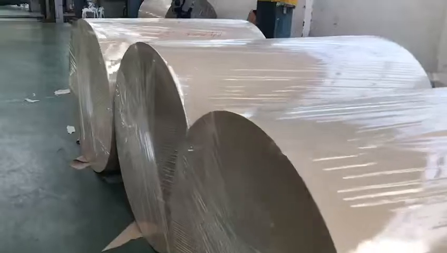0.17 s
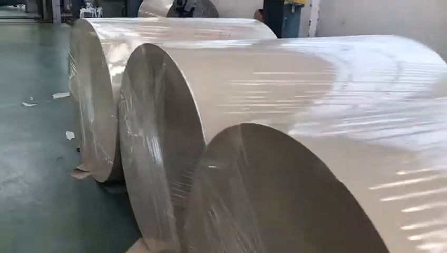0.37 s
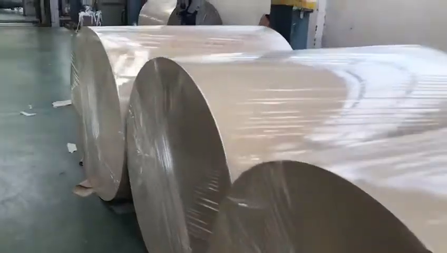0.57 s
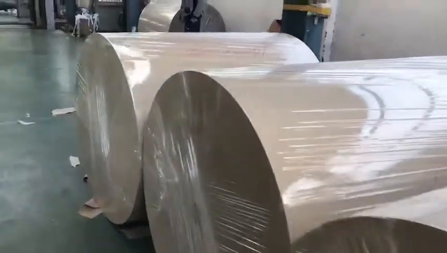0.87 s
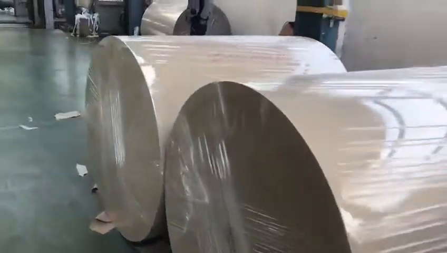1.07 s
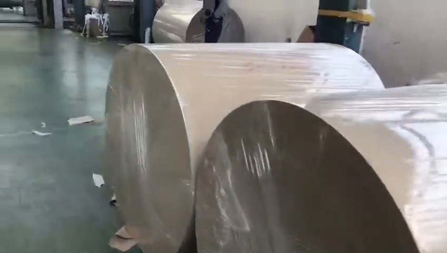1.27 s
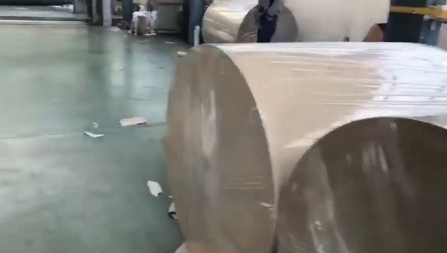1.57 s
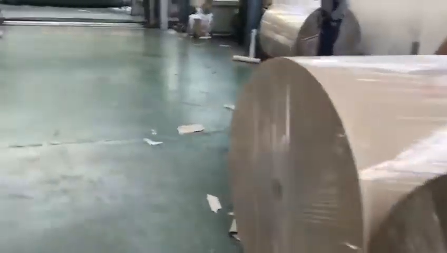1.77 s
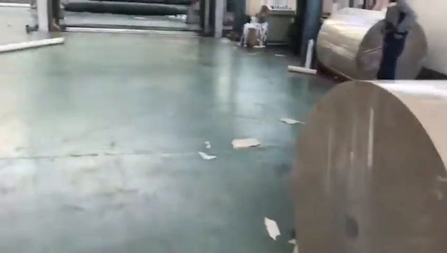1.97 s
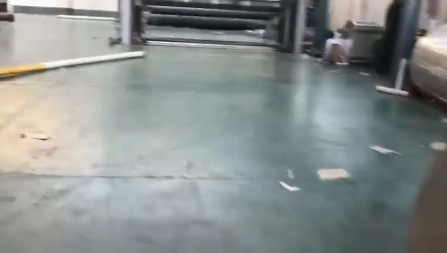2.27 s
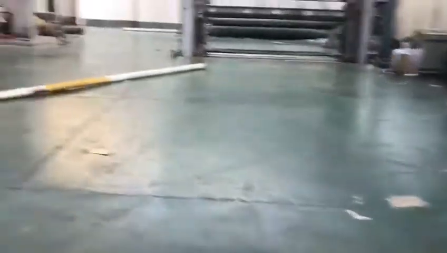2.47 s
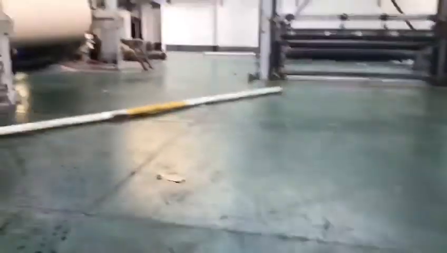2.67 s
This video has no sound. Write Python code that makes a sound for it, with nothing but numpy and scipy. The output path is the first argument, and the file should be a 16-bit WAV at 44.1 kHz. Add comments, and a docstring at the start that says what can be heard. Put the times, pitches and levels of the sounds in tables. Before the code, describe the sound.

Steady low machinery rumble and hum, with rushing air, fills a big factory hall.

```python
"""A large factory hall with paper-making machines running steadily. A roll drive, a pump, a motor
and the mains hum, a gear whines roughly near 1 kHz, and rumble, rushing air and hiss fill the hall.
The microphone is carried slowly through the hall's standing waves, so each low tone swells and
fades on its own."""
import sys
import numpy as np
from scipy import signal
from scipy.fft import rfft, irfft, next_fast_len
from scipy.io import wavfile
from scipy.ndimage import uniform_filter1d, map_coordinates

SR = 44100
rng = np.random.default_rng(int(sys.argv[2]) if len(sys.argv) > 2 else 0)


def put_to_file(sound):
    """Save the sound as 16-bit audio at rate SR, in the file named by the first command-line argument."""
    columns = np.atleast_2d(sound).T  # one column per channel
    safe = np.clip(columns, -1, 1)
    whole_steps = np.round(safe * 32767)
    wavfile.write(sys.argv[1], SR, whole_steps.astype(np.int16))


N = 124803

DRIVE_HZ, PUMP_HZ, MOTOR_HZ, MAINS_HZ = 24.78, 36.72, 334.35, 50


def roll_drive():
    """Low hum: overtones of the drive's rotation."""
    # Each row: time in seconds, level in dB.
    order_4 = [(0.13, -47), (0.22, -43), (0.57, -22), (0.6, -26), (0.87, -22), (1.44, -35), (1.52, -52),
               (1.66, -28), (1.83, -23), (2.35, -18.5), (2.8, -17.5)]
    order_6 = [(0.13, -35), (0.45, -25), (1.21, -31.5), (1.33, -27.5), (2.37, -30.5), (2.43, -42),
               (2.51, -27), (2.8, -34)]
    order_8 = [(.13, -30), (.5, -49), (.8, -27.5), (1.3, -31.5), (1.8, -28.5), (2.2, -27), (2.8, -30.5)]
    # Each row: order, level in dB.
    weak = [(2, -40.5), (7, -34.5), (10, -34.5)]
    return machine(DRIVE_HZ, {4: order_4, 6: order_6, 8: order_8}, weak)


def pump():
    """Deep hum: the pump's fundamental and overtones."""
    # Each row: time in seconds, level in dB.
    order_1 = [(.13, -35.5), (1.2, -30), (2.1, -27), (2.8, -23.5)]
    order_7 = [(.13, -25.5), (.6, -29.5), (1, -27.5), (1.3, -22.5), (1.7, -31), (2.15, -23.5), (2.5, -31),
               (2.8, -24)]
    # Each row: order, level in dB.
    weak = [(2, -36), (6, -33.5)]
    return machine(PUMP_HZ, {1: order_1, 7: order_7}, weak)


def motor():
    """Higher hum: the motor's fundamental and faint overtones."""
    # Each row: time in seconds, level in dB.
    order_1 = [(.13, -46), (.4, -31.5), (.75, -33.5), (1, -35.5), (1.25, -29), (1.6, -25), (2, -37.5),
               (2.35, -37), (2.8, -44)]
    # Each row: order, level in dB.
    weak = [(2, -46), (5, -52.5), (20, -70)]
    return machine(MOTOR_HZ, {1: order_1}, weak)


def mains():
    """Electrical hum: two mains overtones."""
    # Each row: time in seconds, level in dB.
    order_12 = [(.13, -54), (.4, -35.5), (.75, -36.5), (1.1, -47.5), (1.4, -34), (1.8, -42), (2.1, -54),
                (2.35, -35), (2.8, -45.5)]
    # Each row: order, level in dB.
    weak = [(6, -39)]
    return machine(MAINS_HZ, {12: order_12}, weak)


def gear_whine():
    """Close lines beating in a fluttering band."""
    # Each row: time in seconds, level in dB.
    level = [(.13, -31), (.3, -35), (.4, -27.5), (.5, -35.5), (.8, -34.5), (1, -31), (1.17, -37.5),
             (1.42, -32.5), (1.65, -35), (1.85, -33.5), (2.03, -34), (2.3, -32), (2.8, -31.5)]
    # Each row: frequency in Hz, dB relative to that level.
    lines = [(1006.6, -6.5), (1018.6, -9), (1040, -9)]
    beating = sum(machine(hz, {}, [(1, db)]) for hz, db in lines)
    flutter = amp(-4) * band(1009.4, width_hz=51)
    return amp(curve(level)) * (beating + flutter)


def motor_whistle(order=10, line_db=1.5):
    """A high motor overtone: a thin line in a rough band."""
    # Each row: time in seconds, level in dB.
    level = [(.13, -57.5), (.9, -57.5), (1.25, -56), (1.48, -64), (1.8, -55), (2.5, -63), (2.76, -53.5)]
    line = machine(MOTOR_HZ, {}, [(order, line_db)])
    return amp(curve(level)) * (line + band(order * MOTOR_HZ, width_hz=40))


def bearings():
    """Weak, rough bands from bearings and gears."""
    # Each row: centre in Hz, width in Hz, level in dB.
    bands = [(653, 77, -42), (1370, 190, -51.5), (2917, 150, -54), (5400, 630, -59)]
    return sum(amp(db) * band(hz, width_hz) for hz, width_hz, db in bands)


def far_machines():
    """Single tones from machines farther away."""
    # Each row: frequency in Hz, level in dB.
    lines = [(238.4, -32), (444, -51), (454, -48.5), (580, -48.5), (5865, -77), (5928, -62)]
    return sum(machine(hz, {}, [(1, db)]) for hz, db in lines)


def hall(air_db_per_s=0.34, hiss_db_per_s=2.4):
    """Reverberant rumble, rushing air, and hiss that grows as the microphone turns to the machine."""
    # Each row: frequency in Hz, relative spectral density in dB.
    rumble_spectrum = [(20, -34), (35, -14), (60, -5), (90, -6.5), (135, -2), (200, -2.5), (255, 0),
                       (320, -8.5), (400, -19), (700, -20), (2000, -86)]
    air_spectrum = [(100, -1), (400, 1), (700, 0), (950, 2), (1350, -1), (1900, -7.5), (2700, -10),
                    (3500, -13.5), (4800, -21), (6000, -23.5), (10000, -30.5), (14000, -71)]
    hiss_spectrum = [(1000, -22), (4000, 4), (8000, -0.5), (10300, -6.5), (11500, -2.5), (14000, -4)]
    t = seconds()
    rumble = amp(-27 + 0.53 * wobble(11)) * rush(rumble_spectrum, patchy_db=1.9)
    air = amp(-32.5 + air_db_per_s * t + 0.56 * wobble(14)) * rush(air_spectrum, patchy_db=1.15)
    hiss = amp(-56 + hiss_db_per_s * t + 0.7 * wobble(12)) * rush(hiss_spectrum, patchy_db=1.5)
    return rumble + air + hiss


def machine(hz, strong, weak, speed_drift=0.001158, fade_db=2):
    """Orders of one slightly unsteady cycle: strong ones follow level curves, weak ones fade by chance."""
    turns = np.cumsum(hz * (1 + speed_drift * wobble(5))) / SR
    swelling = sum(tone(order * turns, curve(level)) for order, level in strong.items())
    fading = sum(tone(round(order) * turns, db + fade_db * wobble(3.02)) for order, db in weak)
    return swelling + fading


def tone(turns, db):
    """Sine at an rms level, random start phase."""
    return np.sqrt(2) * amp(db) * np.sin(2 * np.pi * (turns + rng.random()))


def band(hz, width_hz):
    """Narrow noise, rms 1: a tone smeared by the hall."""
    return unit(filtered(rng.standard_normal(N), lambda f: 1 / (1 + (2 * (f - hz) / width_hz) ** 4)))


def rush(spectrum, patchy_db):
    """Coloured noise, rms 1, with patches of random gain in frequency and time."""
    cells = signal.stft(rng.standard_normal(N), nperseg=512)[2]
    patches = uniform_filter1d(rng.standard_normal(cells.shape), size=6, axis=0)
    patches = uniform_filter1d(patches, size=10, axis=1)
    noise = signal.istft(cells * amp(patchy_db * unit(patches)), nperseg=512)[1][:N]
    knots_hz, db = np.transpose(spectrum)
    return unit(filtered(noise, lambda hz: amp(np.interp(np.log(hz + 1), np.log(knots_hz), db))))


def filtered(x, response):
    """Apply a gain given as a function of Hz."""
    size = next_fast_len(N + SR // 2)
    return irfft(rfft(x, size) * response(np.fft.rfftfreq(size, 1 / SR)), size)[:N]


def wobble(knots_per_s):
    """Smooth random curve."""
    return map_coordinates(rng.standard_normal(512), [seconds() * knots_per_s + 3], mode="wrap")


def curve(rows):
    """Straight lines through (seconds, value) points."""
    return np.interp(seconds(), *np.transpose(rows))


def amp(db):
    """Decibels to gain."""
    return 10 ** (np.asarray(db) / 20)


def unit(x):
    """Scale to rms 1."""
    return x / np.sqrt(np.mean(x ** 2) + 1e-20)


def seconds():
    """Time of each sample."""
    return np.arange(N) / SR


def scene():
    """All sources at once, mono."""
    hums = roll_drive() + pump() + motor() + mains() + far_machines()
    whines = gear_whine() + motor_whistle() + bearings()
    return (hums + whines + hall())[None]


def record(dry, start_s=0.119, top_hz=14100):
    """Abrupt start, hard band limit."""
    return filtered(dry[0] * (seconds() >= start_s), lambda hz: hz < top_hz)[None]


dry = scene()
out = record(dry)
put_to_file(out)
```